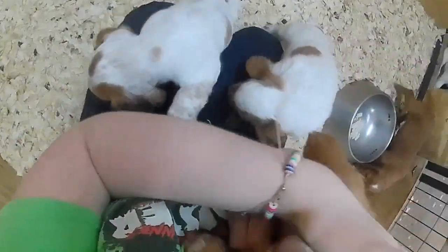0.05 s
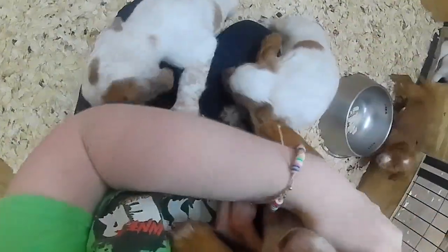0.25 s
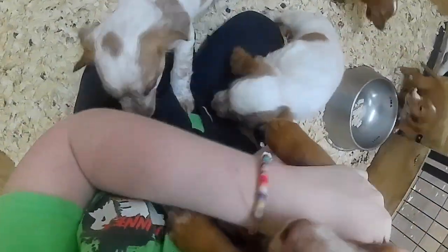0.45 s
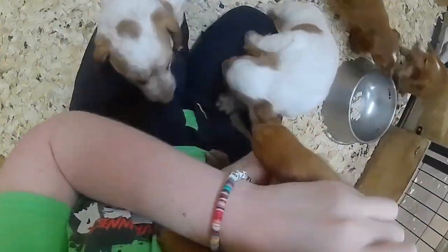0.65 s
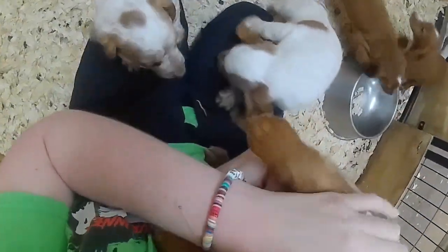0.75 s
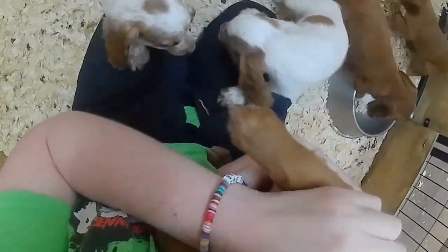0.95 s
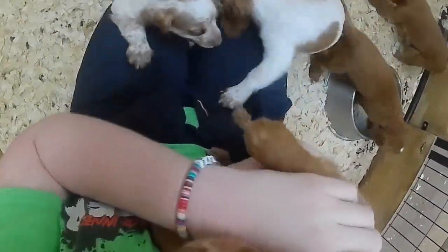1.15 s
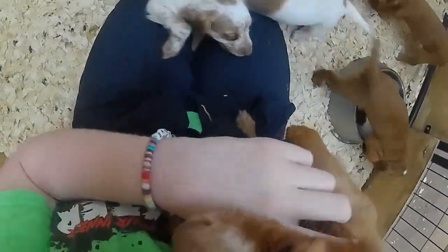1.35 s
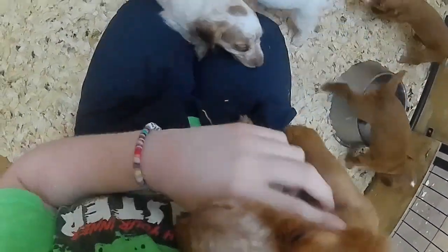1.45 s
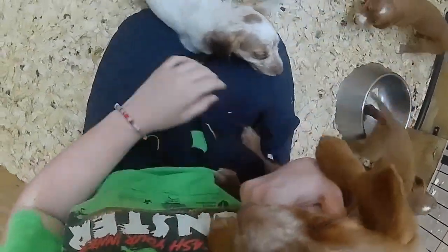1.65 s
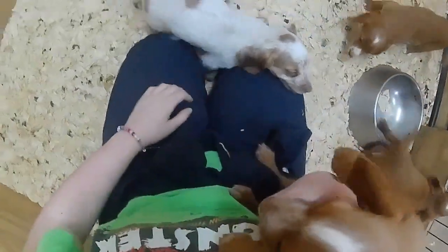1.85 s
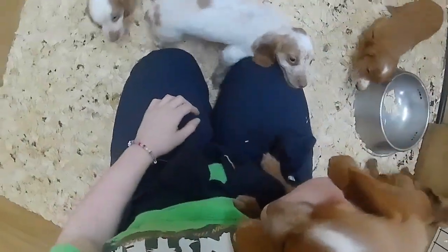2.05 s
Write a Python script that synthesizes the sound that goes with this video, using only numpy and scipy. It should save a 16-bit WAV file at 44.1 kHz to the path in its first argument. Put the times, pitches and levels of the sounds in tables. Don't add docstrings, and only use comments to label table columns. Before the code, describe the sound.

Puppies yip shrilly in overlapping bursts after a quiet moment of scuffing and bowl taps

```python
import sys
import numpy as np
from scipy import signal
from scipy.fft import rfft, irfft, next_fast_len
from scipy.io import wavfile

SR = 44100
rng = np.random.default_rng(int(sys.argv[2]) if len(sys.argv) > 2 else 0)


def to_wav(s):
    ch = np.atleast_2d(s).T
    pcm = np.round(np.clip(ch, -1, 1) * 32767)
    wavfile.write(sys.argv[1], SR, pcm.astype(np.int16))


def level_to_linear(level):
    exponent = np.asarray(level, float) / 20
    return 10 ** exponent


N = 92786


def rms_one(x):
    return x / np.sqrt(np.mean(x ** 2) + 1e-20)


def butter(x, order, hz, kind):
    return signal.sosfilt(signal.butter(order, hz, kind, fs=SR, output="sos"), x)


def drift(rate_hz):
    r = np.exp(-2 * np.pi * rate_hz / SR)
    settled = signal.lfilter([1], [1, -2 * r, r * r], rng.standard_normal(N + SR))[SR:]
    return rms_one(settled)


def coloured(spectrum, patchy_db):
    edges = 16 * 2 ** np.arange(0, 10.4, .5)
    white = rng.standard_normal((2, N + SR))
    hz, db = np.transpose(spectrum)
    out = 0
    for k, (low, high) in enumerate(zip(edges, edges[1:])):
        band = butter(white[k % 2], 2, [low, high], "band")[SR:]
        centre_db = np.interp(np.log(low * high) / 2, np.log(hz), db)
        out = out + band * level_to_linear(centre_db + patchy_db * drift(24.0))
    return rms_one(out)


def ring(clicks, hz, t60):
    r, w = level_to_linear(-60 / (t60 * SR)), 2 * np.pi * hz / SR
    return signal.lfilter([0, np.sin(w)], [1, -2 * r * np.cos(w), r * r], clicks + 1e-18)


# t/s, f/Hz, level/dB
YIP = [(1.259, 1115, -31), (1.266, 1205, -11), (1.274, 1279, -10), (1.288, 1349, -9.5), (1.3, 1281, -13.5),
       (1.322, 1308, -16), (1.336, 1439, -10.5), (1.375, 1420, -25.5), (1.44, 1510, -44)]
YIP_UP = [(1.25, 1793, -29), (1.262, 1912, -18), (1.277, 1870, -17), (1.288, 1877, -13.5),
          (1.298, 1924, -11), (1.322, 1950, -10), (1.365, 1946, -18.5), (1.41, 1850, -48)]
YIP_UNDER = [(1.236, 600, -38.5), (1.25, 760, -29), (1.265, 925, -28), (1.28, 879, -27), (1.3, 908, -45.5),
             (1.33, 920, -60)]
YIP_BODY = [(1.226, 595, -55), (1.238, 620, -36.5), (1.255, 632, -34), (1.275, 635.3, -38.5),
            (1.322, 650, -27), (1.334, 718, -28.5), (1.36, 727.4, -23), (1.385, 705, -29), (1.42, 696, -49)]
AFTER = [(1.93, 1465, -34.5), (1.96, 1450, -29.5), (2.0, 1450, -41), (2.06, 1418, -49)]
GRUNT = [(1.7, 304, -57), (1.74, 293, -47.5), (1.77, 266, -58.5)]
HIGH_WHISTLE = [(1.44, 10350, -68), (1.5, 10200, -66), (1.59, 10050, -63), (1.605, 9900, -45),
                (1.63, 9900, -59)]
SNUFFLE = [(-.02, 5100, -46), (.04, 5300, -61), (.12, 5200, -69), (.19, 4860, -71)]
YIP_PEAK = [(1.325, 2100, -53), (1.342, 2207, -16.5), (1.362, 2182, -12.5), (1.41, 2363, -44.5),
            (1.44, 2360, -42)]
YIP_RASP = [(1.325, 1666, -31), (1.345, 1831, -18.5), (1.375, 1684, -19.5), (1.40, 1834, -28),
            (1.43, 1950, -45.5)]
RISE_LOW = [(1.548, 757.6, -25), (1.56, 859.3, -18), (1.572, 914.7, -12), (1.585, 932.7, -13),
            (1.605, 979.5, -15), (1.622, 1055, -10), (1.64, 1010, -48), (1.655, 1040, -56.5)]
RISE_MID = [(1.562, 882.6, -32), (1.575, 1017, -16.5), (1.586, 1194, -10), (1.605, 1257, -10),
            (1.638, 1251, -18.5), (1.67, 1251, -21.5), (1.70, 1220, -52)]
SQUEAL = [(1.588, 1325, -40), (1.6, 1426, -11.5), (1.614, 1460, -11.5), (1.624, 1476, -2.5),
          (1.64, 1476, -3), (1.665, 1489, -5.5), (1.70, 1485, -35), (1.728, 1545, -20.5),
          (1.755, 1553, -49)]
CRACK = [(1.655, 1616, -44.5), (1.67, 1706, -22.5), (1.684, 1896, -26.5), (1.705, 1870, -29),
         (1.745, 1894, -34)]
SAG = [(1.735, 1317, -30), (1.755, 1106, -30.5), (1.772, 1077, -25.5), (1.785, 838, -22), (1.802, 873, -15),
       (1.825, 836, -45.5)]
WHINE = [(1.783, 1335, -33), (1.793, 1306, -14), (1.812, 1292, -16), (1.852, 1217, -10), (1.872, 1230, -7),
         (1.896, 1144, -9), (1.925, 1115, -14), (1.96, 1141, -26), (1.99, 1147, -31)]
CLIMB = [(1.825, 1324, -23), (1.845, 1423, -13.5), (1.858, 1650, -11), (1.872, 1935, -19.5),
         (1.905, 2020, -17), (1.925, 2028, -19.5), (1.965, 1973, -34)]
TOP = [(1.895, 2260, -36), (1.91, 2356, -18), (1.925, 2447, -21), (1.937, 2685, -25), (1.955, 2610, -36),
       (1.975, 2550, -60)]
GRUMBLE = [(1.43, 290.7, -55), (1.46, 259.3, -45), (1.485, 250.4, -46), (1.515, 316, -56),
           (1.545, 289, -73)]
FAR_CHIRP = [(.128, 887, -50), (.145, 995, -47.5), (.165, 1003, -41), (.18, 956, -44.5), (.19, 826, -45.5),
             (.205, 997, -59), (.24, 1017, -53), (.255, 1020, -66)]
FAR_WHIMPER = [(.33, 1070, -71), (.35, 1075, -50), (.40, 1080, -43.5), (.455, 1068, -47.5),
               (.51, 1035, -68)]
MURMUR = [(1.165, 700, -68), (1.18, 693, -52), (1.205, 692, -49), (1.222, 615, -43), (1.24, 634, -45)]
NOSE_WHISTLE = [(1.09, 6850, -80), (1.115, 6860, -57), (1.14, 6710, -65), (1.23, 6100, -65),
                (1.26, 6230, -78)]
# contour, harmonic levels/dB, roughness/1, breath level/dB
VOICES = [(YIP, [0, -23, -41.5], 0.51, (-14, -22, -20)), (YIP_UP, [0, (-11.5, -11, -30)],
          0.36, (-27, -20, -17)), (YIP_PEAK, [0], 0.5, -31), (YIP_RASP, [0, -7], 0.46, -11),
          (RISE_LOW, [0.5, (-11.5, -45, -34), (-26.5, -18.5, -36.5), (-23.5, -29.5, -33), -40], 0.29, -24),
          (RISE_MID, [0, -8, -19, -36], 0.43, -18.5), (SQUEAL, [0, -25, -37], 0.23, (-29, -31.5, -18.5)),
          (CRACK, [0], 0.59, -10), (SAG, [0], 0.26, -33), (WHINE, [2.46, (-21, -30, -9, -18),
          (-49, -31, -25, -13.5, -15, -25), (-42, -48.5, -50, -39)], 0.2, -32.5),
          (CLIMB, [0, (-34, -22, -20.5, -21.5, -26), (-59, -30.5, -29.5, -38.5), (-60, -30.5, -39),
          (-59, -31, -37), (-66, -39, -41.5), -52.5], 0.318, (-30, -27.5, -14.5, -23)), (TOP, [0],
          0.55, -10), (GRUMBLE, [0, -5, 21, 18], 1.26, 0), (FAR_CHIRP, [0], 0.35, -37), (FAR_WHIMPER, [0],
          0.043, -33), (MURMUR, [0], 0.51, -42), (NOSE_WHISTLE, [0], 0.089, -58), (YIP_UNDER, [0],
          0.32, -17), (YIP_BODY, [(-5, -20, -30), (-1, -8), (1, -5), -2, (-3, -3, 9.5, -16),
          -7, -14] + [-28.0 for k in range(14)], 0.15, (0.5, -14, -9)), (AFTER, [0], 0.79, -16),
          (GRUNT, [0, 1.5, -8], 1.08, -27), (HIGH_WHISTLE, [0], 0.087, -55), (SNUFFLE, [0, -6], 0.79, -58)]
# f/Hz, level/dB
BREATH = [(800, -52), (1300, 13), (2200, 2), (3700, -17), (5000, -26), (9500, -14.5), (15000, -33)]
JITTER, SHIMMER_DB, FLUTTER_HZ = .05, 9.5, 110
FADE_S = .006
SHEEN_HZ, OPEN_S = 4600, .08
UPPER_DB, UPPER_FALL_DB = -54, 1
BRIGHTEN, EFFORT_DB = .3, -11


def puppies():
    out = np.zeros(N)
    air = coloured(BREATH, patchy_db=6.5)
    sheen = butter(air, 4, SHEEN_HZ, "high")
    dull = butter(air, 4, SHEEN_HZ, "low")
    flutters = np.array([drift(FLUTTER_HZ) for k in range(9)])
    for n, (rows, orders_db, rough, breath_db) in enumerate(VOICES):
        s, hz, db = np.transpose(rows)
        start, end = s[0], s[-1]
        span = np.arange(max(int(start * SR), 0), min(int(end * SR), N))
        t, flutter = span / SR, flutters[:, span]

        def along(levels):
            return np.interp(t, np.linspace(start, end, np.size(levels)), np.atleast_1d(levels))

        effort_db = np.interp(t, s, db)
        brighter_db = BRIGHTEN * (effort_db - EFFORT_DB)
        fade = np.clip(np.minimum(t - start, end - t) / FADE_S, 0, 1)
        pitch = np.interp(t, s, hz) * (1 + JITTER * rough * flutter[n % 9])
        phase = 2 * np.pi * np.cumsum(pitch) / SR

        mouth = np.clip((t - start) / OPEN_S, 0, 1)
        breath = np.roll(dull, 999 * n)[span] + mouth * np.roll(sheen, 999 * n)[span]
        call = level_to_linear(along(breath_db) + brighter_db) * breath * (1 + np.cos(phase))

        harmonics = int(min(max(10, len(orders_db)), 15400 / hz.max()))
        for k in range(harmonics):
            order_db = along(orders_db[k] if k < len(orders_db) else UPPER_DB - UPPER_FALL_DB * k)
            shimmer_db = SHIMMER_DB * (rough + 0.023 * min(k, 6)) * flutter[(n + k + 1) % 9]
            order_db = order_db + min(k, 2) * brighter_db + shimmer_db
            call = call + level_to_linear(order_db) * np.sin((k + 1) * phase)
        out[span] += butter(level_to_linear(effort_db) * call * fade, 4, 0.9 * hz.min(), "high")
    return out


# t/s, level/dB, bright mode level/dB
BOWL_TAPS = [
    (0.56, -48.5, -37),
    (0.801, -44.5, 3.5),
    (0.99, -45.5, -38),
    (1.476, -54.5, -13.5),
    (1.593, -46, -19),
    (1.917, -46.5, -12),
]
# f/Hz, level/dB, t60/s
BOWL = [(409, 3, .5), (340, -8, .07), (1790, -10, .12), (2790, -3, .05), (3219, 3, .05), (3596, -5, .09),
        (4270, -1, .07), (4570, -6, .06), (5120, -4, .08), (5610, -7, .06), (6590, -6, .08)]
CRACK_DB, CRACK_T60_S, CRACK_HZ = 5, 0.051, (2460, 6700)


def bowl():
    out, t = np.zeros(N), np.arange(N) / SR
    for k, (hz, db, t60) in enumerate(BOWL):
        clicks = np.zeros(N)
        for s, level_db, bright_db in BOWL_TAPS:
            clicks[int(s * SR)] = level_to_linear(level_db + db + bright_db * (k > 1))
        out += ring(clicks, hz, t60)
    grit = butter(rng.standard_normal(N), 2, CRACK_HZ, "band")
    shape = 0
    for s, db, bright_db in BOWL_TAPS:
        decay_db = 60 * abs(t - s) / CRACK_T60_S
        shape = shape + (t > s) * level_to_linear(db + bright_db + CRACK_DB - decay_db)
    return out + grit * shape


# t/s, level/dB, hold/s, t60/s
SCUFFS = [
    (-.02, -48.5, 0.14, 0.28),
    (0.631, -58.5, 0.018, 0.029),
    (0.797, -48.5, 0.018, 0.17),
    (1.19, -56, 0.019, 0.055),
]
# f/Hz, level/dB
SCUFF = [(2500, -24), (3800, -17), (5300, -2.5), (7000, -8.5), (10000, -6), (15500, -15.5)]


def scuffs():
    t = np.arange(N) / SR
    shape = 0
    for s, db, hold, t60 in SCUFFS:
        attack = np.clip((t - s) / .002, 0, 1)
        shape = shape + level_to_linear(db - 60 * np.clip(t - s - hold, 0, 9) / t60) * attack
    return shape * coloured(SCUFF, patchy_db=2.5)


# t/s, level/dB
SNAPS = [(1.6022, -31), (1.626, -27), (1.629, -30), (.713, -56), (1.776, -45), (2.062, -48)]
SNAP_T60_S, SNAP_HZ = 0.011, (4800, 10000)


def snaps():
    t = np.arange(N) / SR
    hiss = butter(rng.standard_normal(N), 2, SNAP_HZ, "band")
    return hiss * sum((t > s) * level_to_linear(db - 60 * abs(t - s) / SNAP_T60_S) for s, db in SNAPS)


# t/s, level/dB
BUMPS = [(0.241, -33), (0.404, -28.5), (0.639, -27), (0.788, -28), (1.459, -30), (1.676, -27), (1.788, -30)]
BUMP_HZ, BUMP_RISE_S = 66.2, 0.017


def bumps():
    out, t = np.zeros(N), np.arange(N) / SR
    for s, db in BUMPS:
        u = np.clip(t - s, 0, 9) / BUMP_RISE_S
        out += level_to_linear(db) * u * np.exp(1 - u) * np.sin(2 * np.pi * BUMP_HZ * (t - s))
    return out


ROOM_T60_S, ROOM_DB, WALL_CUT_HZ = 0.26, -13, 6350


def room(x):
    size = next_fast_len(N + SR)
    z = np.exp(-2j * np.pi * np.arange(size // 2 + 1) / size)
    dull = np.exp(-2 * np.pi * WALL_CUT_HZ / SR)
    lags = (rng.uniform(.008, .04, size=12) * SR).astype(int)
    wet = 0
    for k, lag in enumerate(lags):
        g = level_to_linear(-60 * lag / SR / ROOM_T60_S) * (1 - dull) / (1 - dull * z) * z ** lag
        wet = wet + (-1) ** k * g / (1 - g)
    for lag in (97, 211):
        wet = wet * (z ** lag - .6) / (1 - 0.58 * z ** lag)
    return irfft(rfft(x, size) * wet, size)[:N]


# f/Hz, level/dB
FLOOR = [(12, -50), (20, 5), (66, 0.5), (136, -13), (404, -22), (630, -26), (1070, -30.5), (1160, -31.5),
         (15500, -49.5)]
FLOOR_DB = -39.5


def hum():
    return level_to_linear(FLOOR_DB) * coloured(FLOOR, patchy_db=3.0)


def scene():
    pen = puppies() + bowl() + scuffs()
    mix = pen + level_to_linear(ROOM_DB) * room(pen) + bumps() + snaps() + hum()
    return mix[None]


def low_pass(x):
    return signal.sosfilt(signal.butter(12, 15620, fs=SR, output="sos"), x)


OFFSET, CEILING = .0104, 1.0
CUTOFF_HZ = 15450


def record(dry):
    x = np.clip(dry + OFFSET, -CEILING, CEILING)
    x = signal.sosfilt(signal.ellip(8, .5, 60, CUTOFF_HZ, fs=SR, output="sos"), x)
    return low_pass(x)


dry = scene()
out = record(dry)
to_wav(out)
```